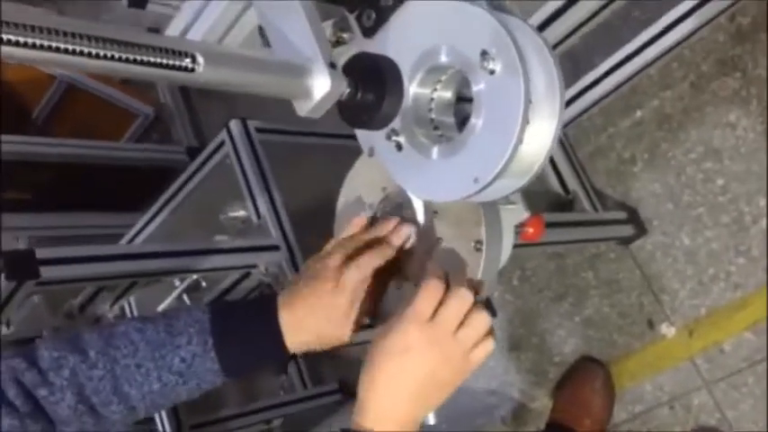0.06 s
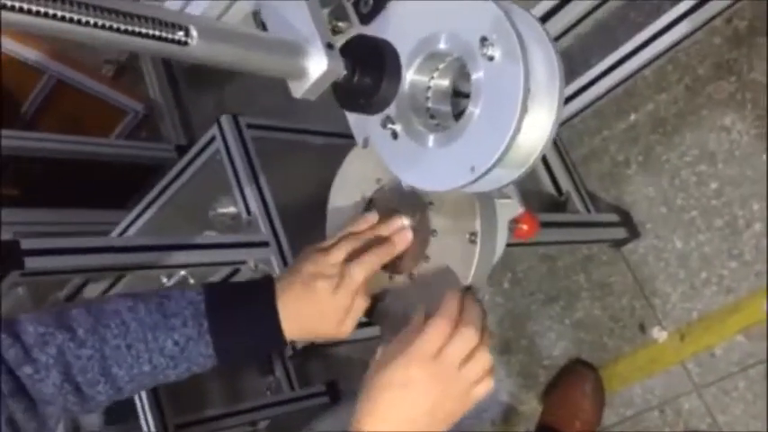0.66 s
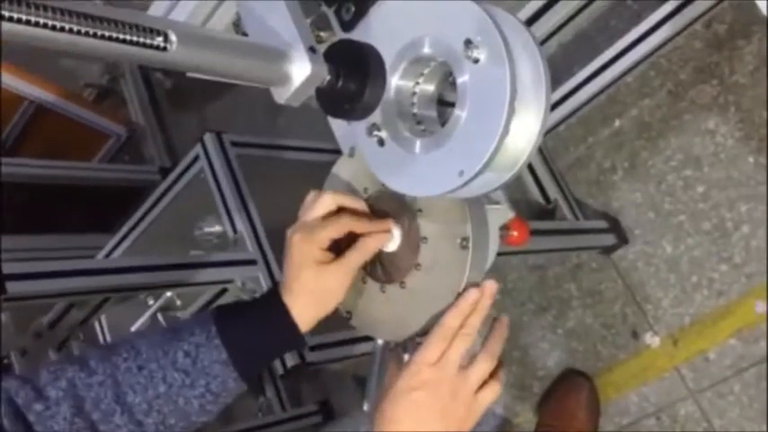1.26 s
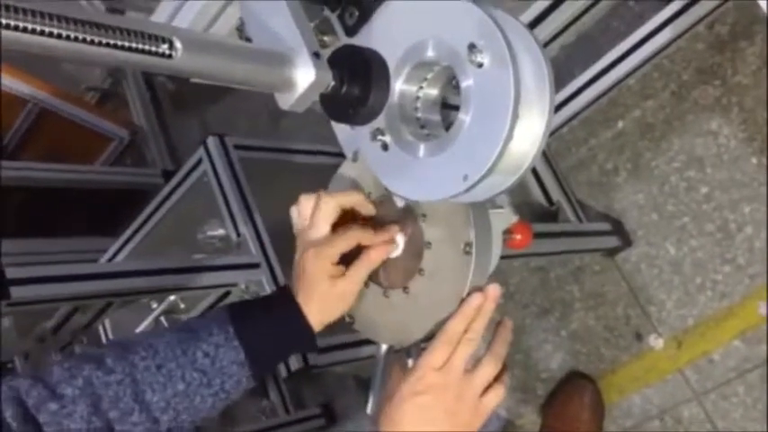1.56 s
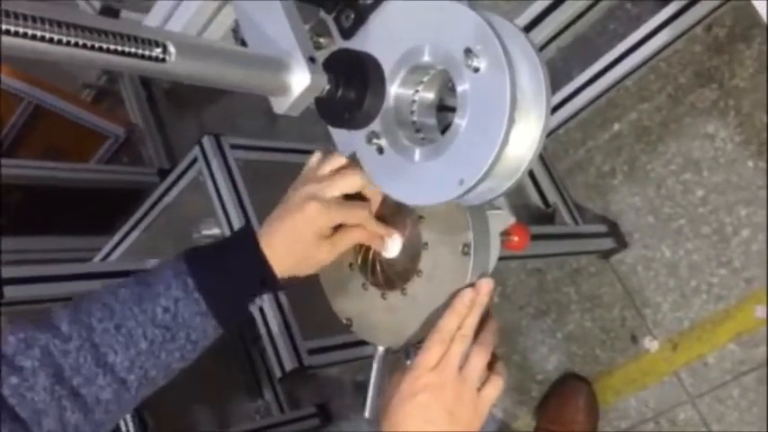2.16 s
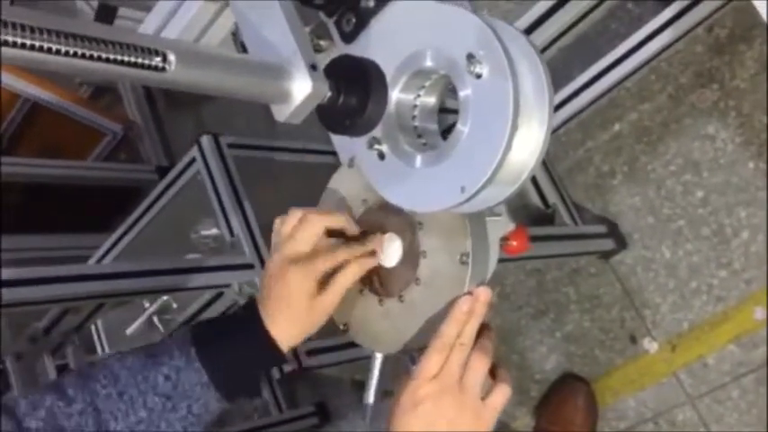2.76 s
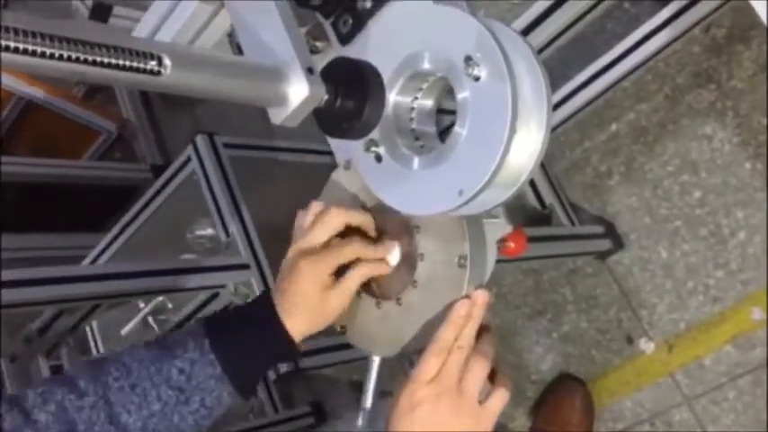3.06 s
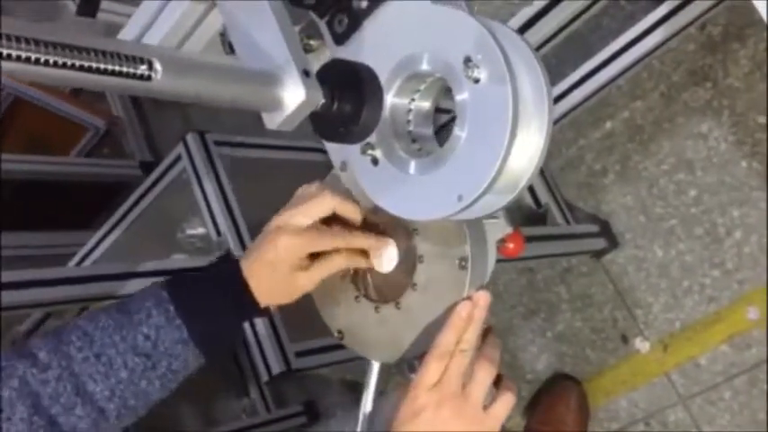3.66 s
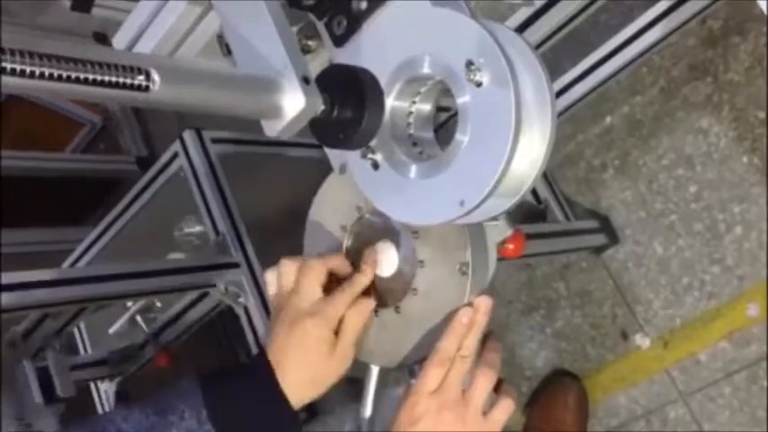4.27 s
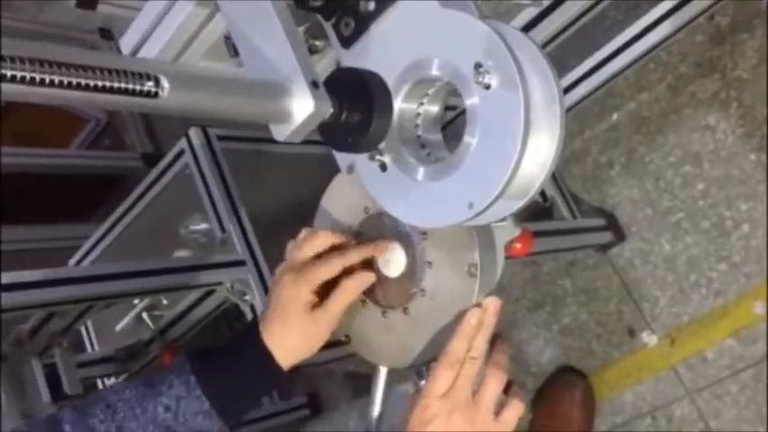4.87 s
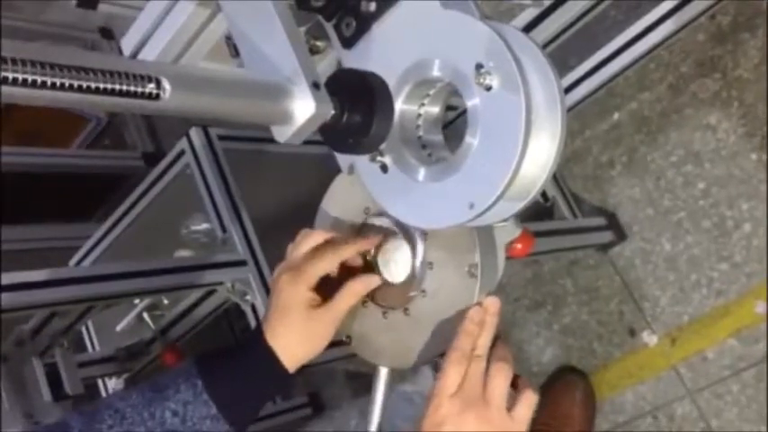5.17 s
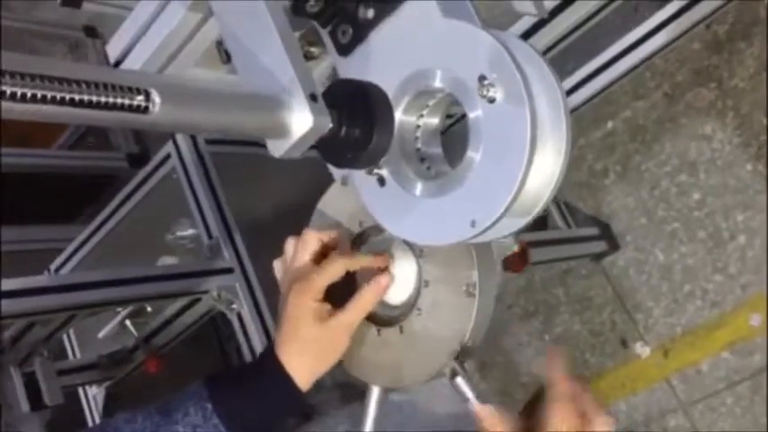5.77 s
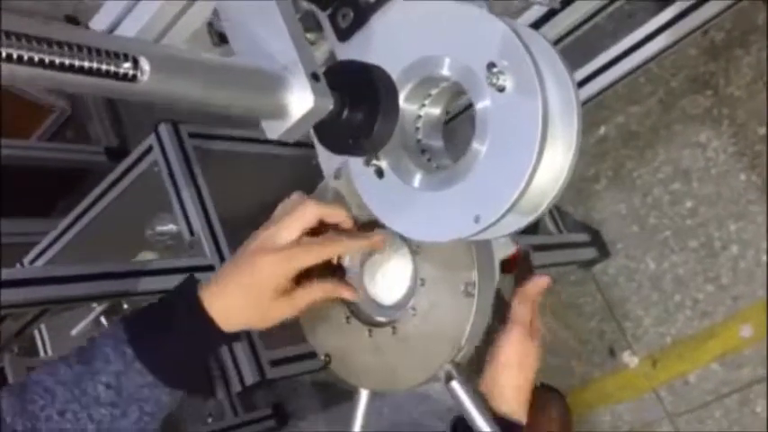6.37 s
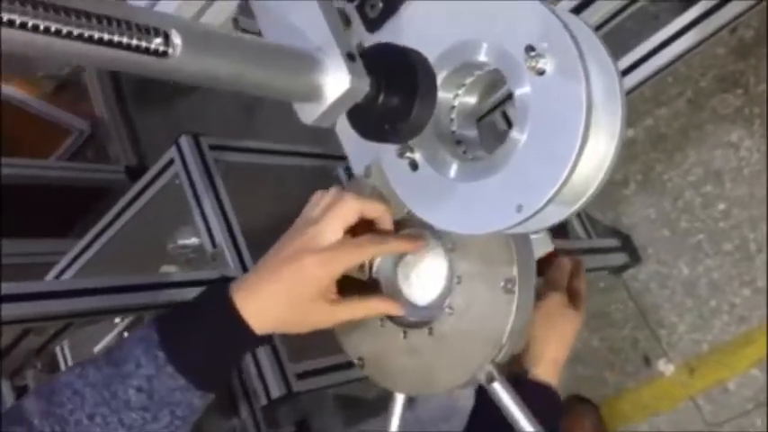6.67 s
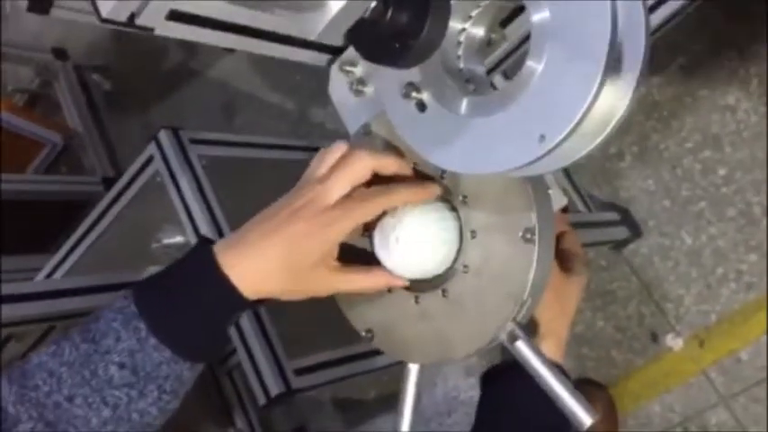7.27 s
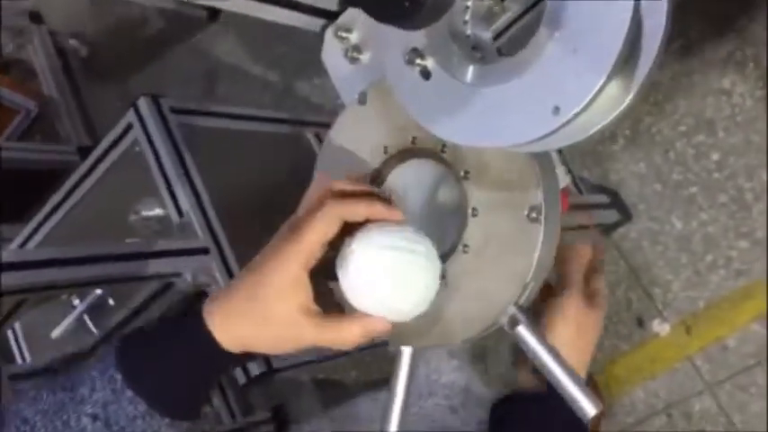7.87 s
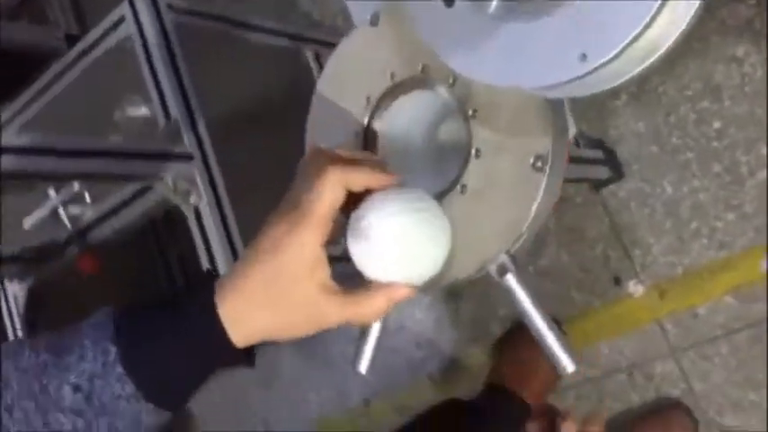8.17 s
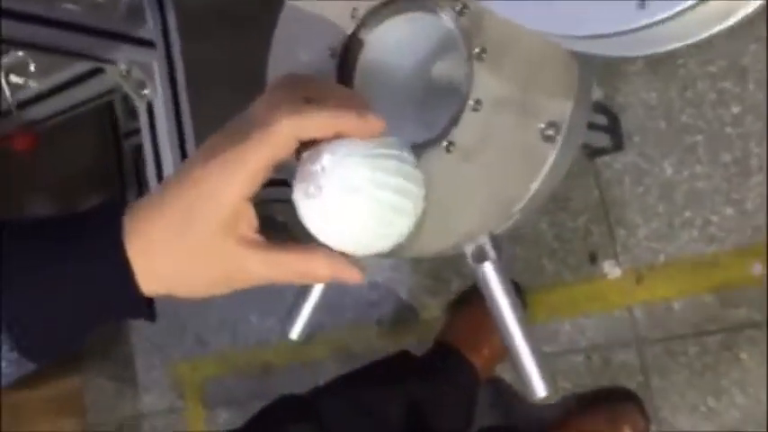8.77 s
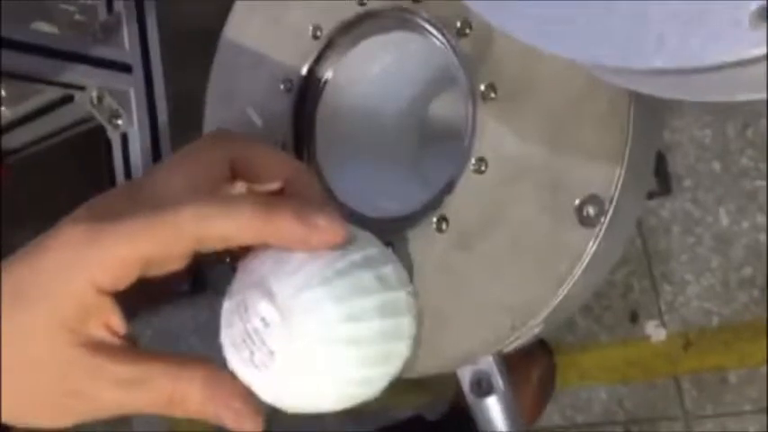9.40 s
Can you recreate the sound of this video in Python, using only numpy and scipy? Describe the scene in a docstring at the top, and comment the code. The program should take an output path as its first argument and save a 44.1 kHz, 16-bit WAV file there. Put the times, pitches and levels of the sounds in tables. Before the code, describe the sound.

A low motor hum and rumble fill a workshop throughout, with a few deep surges between about 1.2 and 2.5 seconds. Close by, hands wrap a round soap in stretch film: faint rustles, crackles and small snaps are scattered all along, clearest from 3 to 4 seconds. Fingers and soap knock lightly on the steel mould, ringing briefly, at the start and several times between 2 and 6 seconds, with an occasional tiny squeak. A bright, fluttering air hiss peaks at 5.3 seconds, and a faint, thin one at 7. At 7.5 seconds a slide judders along with a short scrape and hits its stop at 7.7 with a loud, tight double clack, the loudest event, followed by a small bounce and a short room echo. A dull knock and more crinkles come around 8.2 to 8.5 seconds, then a duller hiss cuts off at about 9.3.

```python
"""Stretch film snaps and rustles as a round soap is wrapped by hand on a small packing machine.
Its creases buckle and its surface slips; fingers and soap squeak on the steel mould and knock it into
ringing, and three short hisses escape through gaps. Near the end a slide scrapes along and hits its stop
with a double clack that the workshop throws back. Motors hum and rumble throughout."""
import sys
import numpy as np
from scipy import signal
from scipy.fft import rfft, irfft, next_fast_len
from scipy.io import wavfile
from scipy.ndimage import uniform_filter1d

SR = 44100
rng = np.random.default_rng(int(sys.argv[2]) if len(sys.argv) > 2 else 0)


def int16_out(signal):
    """Quantize to a 16-bit WAV file."""
    q = np.round(np.clip(np.atleast_2d(signal).T, -1, 1) * 32767)
    wavfile.write(sys.argv[1], SR, q.astype(np.int16))


N = 425124
TIME = np.arange(N) / SR


def film(shiver_db=-21, shiver_t60_s=.1, breadth=1.94, crinkle_db=-5, scatter_s=.03, clump_db=2.5):
    """Buckling and friction: creases pop and shiver, and sliding film sheds clumps of tiny crackles."""
    # the loudest snaps of the film, and the sharp click of one knock on the mould:
    # start_s, level_db, low_hz, high_hz
    snaps = [(0.199, -56, 6000, 12000), (0.346, -54.5, 6050, 12900), (0.983, -58, 6500, 16000),
             (1.0276, -59.5, 2500, 13000), (2.047, -52, 2400, 8500), (2.7437, -48, 6500, 13000),
             (3.259, -46, 5000, 16500), (3.2622, -43.5, 1000, 3300), (3.4716, -45.5, 5330, 17200),
             (3.888, -41.5, 2880, 14000), (4.3052, -57, 7000, 16000), (6.2119, -50, 2400, 7500),
             (6.2363, -55, 5000, 16000), (7.5167, -51, 3200, 11000), (7.71, -49, 4300, 15000),
             (8.2889, -45, 3770, 12500)]
    # rustles of film and fingers, and a low ringing that lingers after the clack:
    # middle_s, length_s, level_db, centre_hz
    rustles = [(0.224, 0.11, -68, 9500), (0.558, .13, -60.5, 4130), (1.734, 0.14, -64.5, 8400),
               (2.033, 0.12, -60.5, 7160), (2.37, 0.23, -71, 6000), (2.818, .14, -65.5, 1400),
               (3.272, .13, -62, 7200), (3.738, 0.053, -62.5, 4000), (4.183, .11, -67, 3780),
               (4.961, 0.044, -61, 2820), (5.621, .07, -66.5, 8500), (5.871, .11, -57, 8400),
               (6.101, .18, -66, 1010), (6.222, .12, -67, 6940), (6.469, 0.11, -62.5, 5000),
               (6.577, 0.067, -61, 8350), (7.4, .09, -67, 9000), (8.253, 0.24, -63.5, 755),
               (8.347, 0.046, -58, 10000), (8.492, 0.036, -56.5, 7500), (8.543, .08, -55, 10500)]
    # tone colour of the film, laid over all these sounds: frequency_hz, gain_db
    film_colour = [(500, 3), (1400, 4), (2600, 5), (5500, 2), (8000, -3), (9500, 2), (10700, -4),
                   (13000, 2.5), (16000, 1)]
    out, t = np.zeros(N), np.arange(SR // 10) / SR
    tremble = decay(t, .008) + amp(shiver_db) * decay(t, shiver_t60_s)
    # three faint crinkles gather around each rustle
    crinkles = [(s + scatter_s * offset, db + crinkle_db + 2 * strength, hz)
                for s, _, db, hz in rustles for offset, strength in rng.standard_normal((3, 2))]
    ticks = [(s, db, hz / breadth, hz * breadth) for s, db, hz in crinkles + faint(db=-66.5, count=34)]
    for s, db, low_hz, high_hz in snaps + ticks:
        # one sharp pulse, then a trembling tail
        pop = blow(signal.unit_impulse(len(t))) + blow(rng.standard_normal(len(t)) * tremble)
        add(out, s, amp(db) * blow(band(pop, low_hz, high_hz)))
    rubs = [(s, .12, db, hz) for s, db, hz in faint(db=-72, count=22)]
    for s, length, db, hz in rustles + rubs:
        slips = band(grains(SR // 3, spread_db=4), hz / breadth, hz * breadth)
        slips = patchy(slips, depth_db=5)[:round(length * SR)]
        clumps = unit(uniform_filter1d(rng.standard_normal(len(slips)), size=300))  # about 7 ms each
        crackle = unit(slips * amp(clump_db * clumps))
        add(out, s - length / 2, amp(db) * crackle * signal.windows.tukey(len(crackle), .8))
    return np.std(out) * colour(out, film_colour)


def faint(db, count, span_s=9.9, spread_db=7, centre_hz=9000, octaves=.5):
    """Chance contacts with the film, one in each equal slot of time: time_s, level_db, centre_hz."""
    return [(span_s * (k + when) / count,
             db + spread_db * (2 * strength - 1),
             centre_hz * 2 ** (octaves * (2 * pitch - 1)))
            for k, (when, strength, pitch) in enumerate(rng.random((count, 3)))]


def knocks(scuff_db=-2, thud_db=-9):
    """Modal ringing: soap and fingers bump and scuff the steel mould, each time with a dry thud."""
    # light knocks: start_s, level_db, tilt_db_per_octave
    bumps = [(0.109, -45, 1.5), (2.216, -50.5, -2), (2.3313, -42.5, 3), (2.8834, -49, -1.5),
             (2.9886, -47.5, -0.5), (3.2629, -42, 4.5), (4.168, -46, -1), (4.5694, -46.5, 1),
             (5.8794, -46.5, 0.5), (8.191, -40, -7.5)]
    # modes of the mould: pitch_hz, level_db, t60_s
    mould_modes = [(792, 6.5, 0.046), (1016, 3.5, 0.078), (1183, 3, 0.046), (1420, 0.5, 0.039),
                   (2023, -6.5, 0.05), (2506, -0.5, 0.036), (3280, -4, 0.038), (3775, -5.5, 0.043),
                   (4520, -11.5, 0.065), (5980, -12, 0.028)]
    out, t = np.zeros(N), np.arange(SR // 5) / SR
    for s, db, tilt_db in bumps:
        mould = blow(ring(mould_modes, t, tilt_db))
        contact = rng.standard_normal(len(t)) * decay(t, .04)
        scuff = blow(signal.fftconvolve(contact, mould)[:len(t)])
        thud = blow(band(contact, 660, 3800 * amp(tilt_db), order=4))
        add(out, s, amp(db) * blow(mould + amp(scuff_db) * scuff + amp(thud_db) * thud))
    return out


def squeaks(relative_width=.18):
    """Stick-slip friction: skin and taut film on steel give brief, fuzzy tones."""
    # squeaks: middle_s, length_s, level_db, pitch_hz
    slips = [(0.554, .1, -58, 1190), (5.894, 0.048, -51.5, 1340), (6.873, 0.017, -47.5, 1350),
             (7.335, 0.028, -61, 1990), (7.485, .022, -55, 14500)]
    out = np.zeros(N)
    for s, length, db, hz in slips:
        narrow = resonate(rng.standard_normal(SR // 4), [(hz, hz * relative_width, 0)])
        tone = unit(narrow[:round(length * SR)])
        add(out, s - length / 2, amp(db) * tone * signal.windows.hann(len(tone)))
    return out


def slide(judder_db=2, crack_t60_s=.042):
    """Friction, then impact: the slide judders along its guide, strikes the stop and bounces."""
    # jerks towards the stop: start_s, length_s, level_db
    jerks = [(7.514, .035, -42.5), (7.556, .04, -42.5), (7.635, 0.033, -48.5)]
    # spectrum of the scrape: frequency_hz, density_db
    scrape_colour = [(400, -25), (620, -9), (850, 4), (1200, 0), (1380, -7), (1650, 7), (2500, -1),
                     (3400, -8), (4300, -16), (5300, -20), (8000, -28), (11000, -42), (16000, -44)]
    # resonances of the scraping gap: centre_hz, base_width_hz, gain_db
    scrape_peaks = [(643, 12, 6.5), (1134, 27, -2.5), (1290, 24, -4), (1540, 93, -12), (2860, 37, -8),
                    (3140, 30, -9), (5400, 83, -20), (5570, 67, -30), (7700, 76, -30)]
    # blows on breaking loose and at the stop: start_s, level_db, crack_to_ring_db, tilt_db_per_octave
    clacks = [(7.5165, -42, -1, 4), (7.6642, -23.5, -2, 3.5), (7.6668, -15, -14.5, .5),
              (7.6785, -27, 3, -3), (7.683, -27, -3, -8), (7.864, -35.5, -24, -5.5)]
    # modes of the stop and frame: pitch_hz, level_db, t60_s
    frame_modes = [(385, -11.5, .16), (530, -10, 0.082), (639, 10.5, 0.14), (654, -28, 0.91),
                   (680, -16, 0.099), (845, -3.5, 0.16), (1223, 2, 0.092), (1410, -12, 0.036),
                   (1600, -25, .06), (1760, -10, 0.058), (1910, -2, 0.07), (2030, -6, 0.055),
                   (2220, -17, 0.073), (2680, -18, .05), (3220, 2.5, 0.023), (5250, -6.5, 0.03),
                   (6500, -15, 0.037)]
    # spectrum of the crack at contact: frequency_hz, density_db
    crack_colour = [(300, -9.5), (600, -1.5), (980, 0), (1400, 0.5), (1950, 2), (2700, -9.5), (4200, -17),
                    (6500, -14), (9000, -19.5), (16000, -29)]
    friction = rush(scrape_colour, scrape_peaks, peaks_db=0, grain_db=2.5)
    scrape = unit(friction * amp(judder_db * drift(300)))
    out = bursts(jerks, rise_s=.0051, fall_db_per_s=520) * scrape
    t = np.arange(SR) / SR
    for s, db, crack_db, tilt_db in clacks:
        crack = colour(rng.standard_normal(len(t)), crack_colour) * decay(t, crack_t60_s)
        add(out, s, amp(db) * (blow(ring(frame_modes, t, tilt_db)) + amp(crack_db) * blow(crack)))
    return out


def puff():
    """Flow noise from a gap: a fluttering hiss that brightens at its sharp crest."""
    # course of the flow: open_s, crest_s, shut_s, width_s, body_db, treble_db, brightening
    flows = [(5.12, 5.343, 5.7, 0.056, -32.5, -34.5, 1.0)]
    # broad spectrum: frequency_hz, density_db
    spectrum = [(350, -51), (600, 3), (1450, 1.5), (1700, -6), (2400, 0), (4400, -4.5), (5700, 4),
                (6900, -12.5), (8100, -8.5), (9000, -7), (10500, -11), (13000, -12), (16000, -20)]
    # resonances of the gap: centre_hz, base_width_hz, gain_db
    peaks = [(1190, 15, -8), (1478, 71, 6), (2030, 200, 1.5), (2430, 38, 3), (2634, 45, 0), (3700, 110, -5),
             (5530, 45, -3), (5646, 110, -10), (6400, 100, -7), (9180, 31, 0), (9170, 90, -12),
             (9870, 75, -22)]
    return hiss(flows, rush(spectrum, peaks, peaks_db=-6, grain_db=1), flutter_db=1.9)


def leak():
    """Flow noise from a gap: a faint, thin hiss with a broad crest."""
    # flow and weaker after-flow: open_s, crest_s, shut_s, width_s, body_db, treble_db, brightening
    flows = [(6.882, 7.037, 7.18, 0.14, -49, -50.5, .1), (7.2, 7.24, 7.29, 0.11, -71, -65.5, 0)]
    # broad spectrum: frequency_hz, density_db
    spectrum = [(710, 0), (1200, -3.5), (1630, -14), (1910, -6), (2620, -4.5), (2790, -9), (3660, -0.5),
                (4800, -7), (5650, -1.5), (9410, -3.5), (10300, -7.5), (15200, -5.5), (16000, -11)]
    # resonances of the gap: centre_hz, base_width_hz, gain_db
    peaks = [(1930, 70, 1), (4510, 59, 2), (5650, 260, -1), (6040, 35, 1), (9060, 150, -3), (10800, 51, -7),
             (12500, 160, -11)]
    return hiss(flows, rush(spectrum, peaks, peaks_db=-9, grain_db=3.5), flutter_db=.5)


def swish():
    """Flow noise from a gap: a duller hiss, shut off just after its crest."""
    # flow and weaker after-flow: open_s, crest_s, shut_s, width_s, body_db, treble_db, brightening
    flows = [(9.098, 9.29, 9.335, 0.097, -37, -51.5, 0), (9.35, 9.43, 9.51, 0.13, -54.5, -59.5, 0)]
    # broad spectrum: frequency_hz, density_db
    spectrum = [(450, -11), (850, 1.5), (1150, 1.5), (1700, -3.5), (2100, 1), (2900, -3.5), (3400, 2),
                (4300, -0.5), (5100, -7.5), (7500, -16.5), (9200, -20), (10500, -23.5), (16000, -25.5)]
    # resonances of the gap: centre_hz, base_width_hz, gain_db
    peaks = [(1119, 22, 1), (2140, 220, -2), (2590, 29, -1), (3470, 14, -8), (3720, 49, 0), (4600, 53, -6),
             (5770, 160, -15), (8720, 50, -17)]
    return hiss(flows, rush(spectrum, peaks, peaks_db=-5.5, grain_db=3), flutter_db=.4)


def hiss(flows, noise, flutter_db, steepness=2.24, presence_share=.28):
    """Noise grows with flow; the treble gains a further `brightening` dB for each dB of flow."""
    bright, treble = (signal.sosfiltfilt(signal.butter(4, hz, "high", fs=SR, output="sos"), noise)
                      for hz in (3200, 6800))
    low, presence = noise - bright, bright - treble
    out = np.zeros(N)
    for open_s, crest_s, shut_s, width_s, body_db, treble_db, brightening in flows:
        flow = (1 + ((TIME - crest_s) / width_s) ** 2) ** (-steepness / 2)
        body = (low + flow ** (presence_share * brightening) * presence) / np.std(noise - treble)
        top = flow ** brightening * unit(treble)
        opening = gate(open_s, shut_s, rise_s=.034, fall_db_per_s=265)
        out += opening * flow * (amp(body_db) * body + amp(treble_db) * top)
    return out * amp(flutter_db * drift(150))


def swell():
    """Amplitude modulation: a deep rumble comes and goes in a few surges."""
    # surges: start_s, length_s, level_db
    surges = [(1.18, 0.13, -31.5), (1.37, 0.13, -32.5), (1.82, 0.14, -25.5), (2.0, .47, -34.5)]
    # spectrum of the surging rumble: frequency_hz, density_db
    spectrum = [(20, -25), (34, -27), (45, 3), (58, 13), (80, 4.5), (120, -8.5), (200, -16.5), (400, -86)]
    throb = signal.hilbert(colour(rng.standard_normal(N), spectrum))
    steady = throb.real / np.sqrt(uniform_filter1d(abs(throb) ** 2, size=4000))  # evens out the power
    return bursts(surges, rise_s=.049, fall_db_per_s=82) * unit(steady)


def drives(pitch_hz=74.2, first_db=-48.8, second_db=-51.5, beat_hz=.3, in_step_s=4.34, wander_rad=.37):
    """Beating: the tones of two drives at nearly the same speed reinforce and partly cancel in turn."""
    beat = 2 * np.pi * beat_hz * (TIME - in_step_s)
    phase = 2 * np.pi * (pitch_hz * TIME + rng.random()) + wander_rad * drift(4.4)
    return np.sqrt(2) * (amp(first_db) * np.sin(phase) + amp(second_db) * np.sin(phase - beat))


def workshop(shaft_hz=24.78, waver_db=.54, wander_rad=.27, rumble_db=-42, air_db=-57.5, flutter_db=.92):
    """Shaft harmonics: a motor hums among other machines, over a rumble and the wash of the room."""
    # hum of the main motor: shaft_multiple, level_db
    orders = [(2, -52.5), (5, -60.5), (8, -59.5)]
    # tones of other machines: pitch_hz, level_db
    tones = [(112, -61), (256, -67), (330.5, -62), (355.3, -61.5), (528, -70), (537, -76), (689, -70),
             (1943, -88), (2800, -90)]
    # spectrum of the rumble: frequency_hz, density_db
    rumble_colour = [(20, -48), (36, -9.5), (52, 0.5), (85, 2.5), (140, -3.5), (190, -7), (240, -15),
                     (300, -12.5), (360, -10), (440, -27.5), (600, -56)]
    # spectrum of the room's wash: frequency_hz, density_db
    air_colour = [(200, -36), (450, -6.5), (560, -1), (680, 2.5), (850, -4), (1300, -16), (2200, -20.5),
                  (4300, -29.5), (6000, -31.5), (9300, -38.5), (10300, -83), (11500, -48), (16000, -76)]
    hum = np.zeros(N)
    for hz, db in [(k * shaft_hz, db) for k, db in orders] + tones:
        peak = np.sqrt(2) * amp(db + waver_db * drift(2.5))
        hum += peak * np.sin(2 * np.pi * (hz * TIME + rng.random()) + wander_rad * drift(4))
    rumble = amp(rumble_db) * colour(rng.standard_normal(N), rumble_colour)
    air_gain = amp(air_db + flutter_db * drift(25))
    air = patchy(colour(rng.standard_normal(N), air_colour), depth_db=2.5)
    return hum + rumble + air_gain * air


def room(x, density=.1, delay_s=.006):
    """Reverberation: dense reflections, each band dying at its own rate."""
    # reverberation times: frequency_hz, t60_s
    decay_times = [(200, 0.97), (700, 1), (2500, 0.71), (5000, 0.38), (14000, 0.5)]
    taps = rng.standard_normal(SR) * (rng.random(SR) < density) * (np.arange(SR) > delay_s * SR)
    hz, t, bands = signal.stft(taps, SR, nperseg=256)
    tail = signal.istft(bands * decay(t, read(decay_times, hz)[:, None]), SR, nperseg=256)[1]
    return signal.fftconvolve(x, tail / np.linalg.norm(tail))[:N]


def ring(modes, t, tilt_db=0):
    """Damped modes of alternating sign, superposed and tilted in dB per octave."""
    return sum(amp(db + tilt_db * np.log2(hz)) * decay(t, t60) * (-1) ** k * np.sin(2 * np.pi * hz * t)
               for k, (hz, db, t60) in enumerate(modes))


def rush(spectrum, peaks, peaks_db, grain_db, widen=1.2):
    """Resonances stand out of grainy broadband noise; the texture repeats each second."""
    narrow = resonate(grains(SR, grain_db), [(hz, width * widen, db) for hz, width, db in peaks])
    broad = colour(grains(SR, grain_db), spectrum)
    return np.resize(unit(broad + amp(peaks_db) * narrow), N)


def resonate(x, peaks):
    """Parallel resonances filter x, at rms 1."""
    size = next_fast_len(len(x))
    hz = np.fft.rfftfreq(size, 1 / SR)
    gain = sum(amp(db) / (1 + 2j * (hz - centre) / width) ** 2 for centre, width, db in peaks)
    return unit(irfft(rfft(x, size) * gain, size)[:len(x)])


def grains(size, spread_db):
    """Noise made of tiny slips of uneven strength."""
    return unit(rng.standard_normal(size) * amp(spread_db * np.minimum(rng.exponential(1, size), 5)))


def patchy(x, depth_db):
    """Random modulation: the level wanders in patches of about 250 Hz by 45 ms."""
    bands = signal.stft(x, SR, nperseg=512)[2]
    across_bands = uniform_filter1d(rng.standard_normal(bands.shape), size=3, axis=0)
    patches = unit(uniform_filter1d(across_bands, size=8, axis=1))
    return unit(signal.istft(bands * amp(depth_db * patches), SR, nperseg=512)[1][:len(x)])


def drift(per_s):
    """A random fluctuation of rms 1 that changes course per_s times a second."""
    return unit(np.interp(TIME * per_s, np.arange(8192), rng.standard_normal(8192)))


def colour(x, points):
    """Spectral shaping of x, at rms 1."""
    size = next_fast_len(len(x))
    gain = amp(read(points, np.fft.rfftfreq(size, 1 / SR)))
    return unit(irfft(rfft(x, size) * gain, size)[:len(x)])


def read(points, hz):
    """Linear interpolation on a log-frequency axis."""
    f, value = np.transpose(points)
    return np.interp(np.log(hz + 1), np.log(f + 1), value)


def band(x, low_hz, high_hz, order=2):
    """Causal band-pass."""
    edges = np.clip([low_hz, high_hz], 10, [.4 * SR, .48 * SR])
    return signal.sosfilt(signal.butter(order, edges, "band", fs=SR, output="sos"), x)


def bursts(rows, rise_s, fall_db_per_s):
    """Envelope of bursts that share one attack and release."""
    return np.max([amp(db) * gate(s, s + length, rise_s, fall_db_per_s)
                   for s, length, db in rows], axis=0)


def gate(start_s, end_s, rise_s, fall_db_per_s):
    """A smooth attack, a hold until end_s, and an exponential release."""
    attack = np.sin(np.pi / 2 * np.clip((TIME - start_s) / rise_s, 0, 1)) ** 2
    return attack * amp(-fall_db_per_s * np.clip(TIME - end_s, 0, 1))


def decay(t, t60_s):
    """Exponential damping by 60 dB in t60_s."""
    return np.exp(-np.log(1000) * t / t60_s)


def blow(x):
    """Scales a hit to the energy of 4 ms at rms 1."""
    return x / np.sqrt(np.sum(x ** 2) / (.004 * SR))


def unit(x):
    """Scales to rms 1."""
    return x / np.sqrt(np.mean(x ** 2) + 1e-20)


def amp(db):
    """Decibels to gain."""
    return 10 ** (np.asarray(db) / 20)


def add(mix, s, sound):
    """Mixes a sound in at time s."""
    part = mix[max(round(s * SR), 0):][:len(sound)]
    part += sound[:len(part)]


def scene(machine_room_db=-14, hand_room_db=-15, hiss_room_db=-19):
    """Superposition: hands and machine close by, their reflections, and the workshop around them."""
    hisses = puff() + leak() + swish()
    machine = slide()
    hands = knocks() + film() + squeaks()
    echo = room(amp(machine_room_db) * machine + amp(hand_room_db) * hands + amp(hiss_room_db) * hisses)
    background = workshop() + drives() + swell()
    return (hands + machine + hisses + echo + background)[None]


def record(dry, edge_hz=16100):
    """Band limiting: a steep low-pass removes the highest treble."""
    low_pass = signal.firwin(511, edge_hz, window=("kaiser", 9), fs=SR)
    return signal.oaconvolve(dry, low_pass[None], "same")


dry = scene()
out = record(dry)
int16_out(out)
```